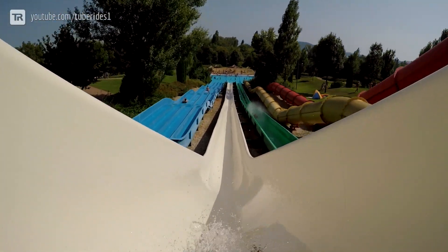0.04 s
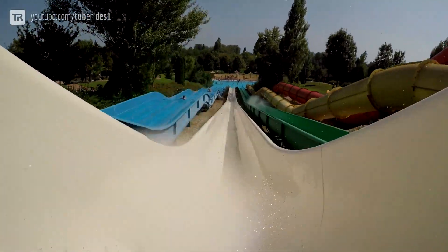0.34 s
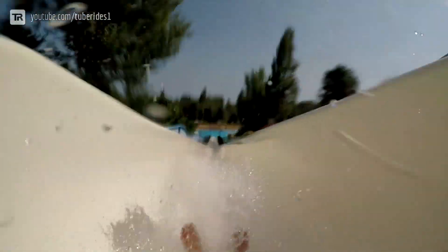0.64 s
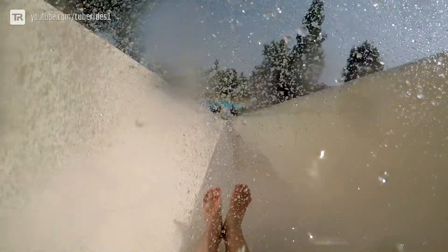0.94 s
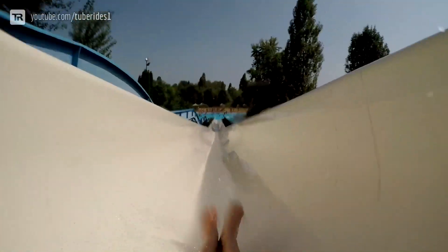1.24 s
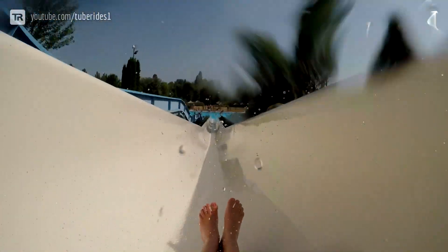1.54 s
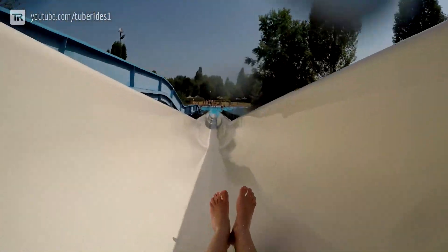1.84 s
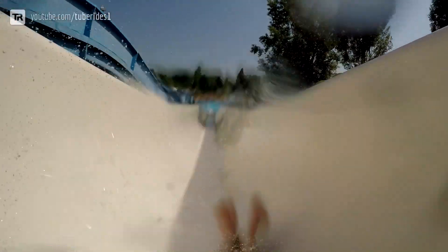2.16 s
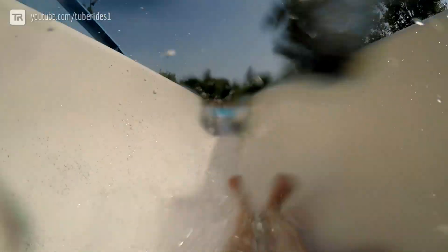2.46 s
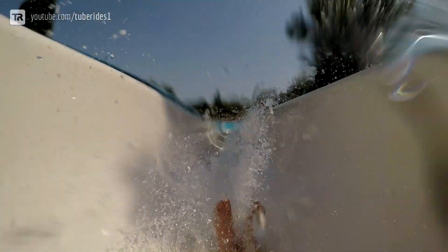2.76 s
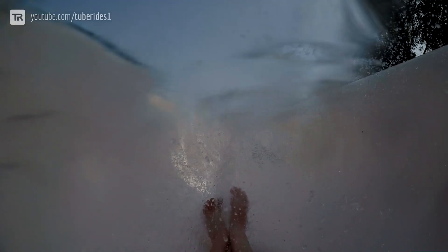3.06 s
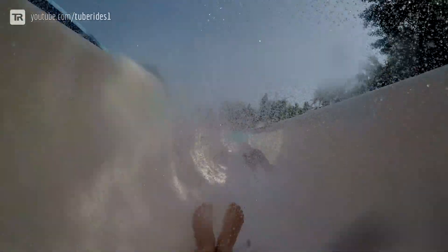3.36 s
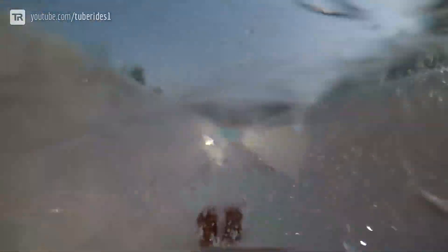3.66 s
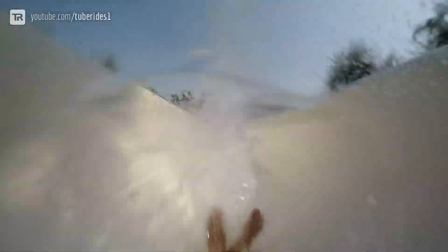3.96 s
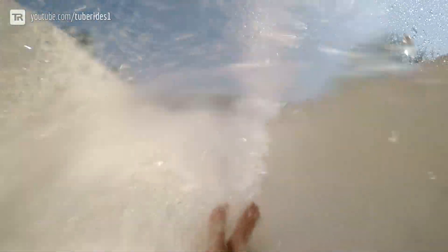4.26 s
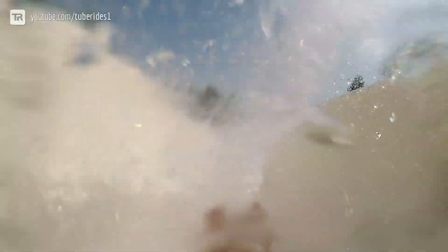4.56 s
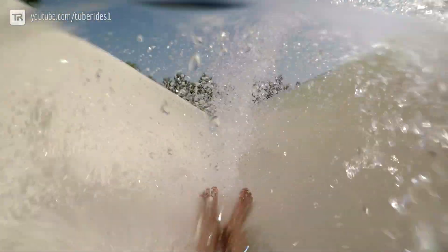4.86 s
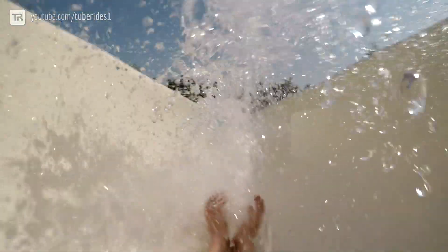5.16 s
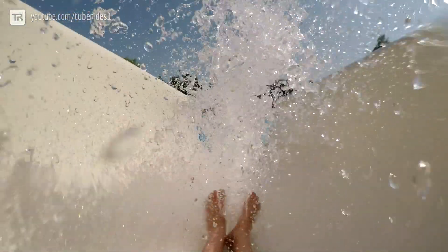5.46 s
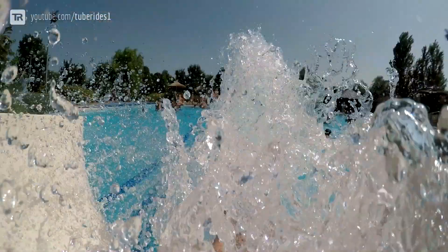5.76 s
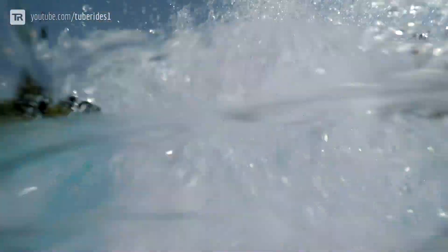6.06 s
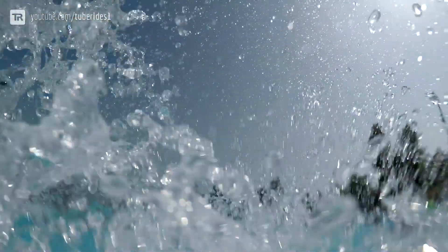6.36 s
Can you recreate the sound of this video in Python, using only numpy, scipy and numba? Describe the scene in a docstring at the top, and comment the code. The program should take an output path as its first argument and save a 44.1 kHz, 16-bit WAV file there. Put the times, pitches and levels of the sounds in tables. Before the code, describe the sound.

Gusts of air and water rumble against a small waterproof camera held by a rider going down an open water slide. Water churns and gurgles right over the microphone with a hollow ring, while spray hisses and single drops plink on the case. Slugs of water slap it repeatedly and the rider thuds softly on the slide twice. At the end, loud sheets of water crash over the microphone as the rider enters the pool.

```python
"""An open water slide and its pool, from the microphone ports of a small waterproof camera in the
rider's hand. Everything is close: gusts of air and water buffet the housing, and the wash churns under
a film of water that rings over the ports. Spray rattles on the case, slugs of water slap it, and twice
the rider thuds on the slide. As the rider ploughs into the pool, three sheets of water close over it."""
import sys
import numpy as np
from scipy import signal
from scipy.fft import rfft, irfft, next_fast_len
from scipy.io import wavfile
from scipy.ndimage import uniform_filter1d
from numba import njit

SR = 44100
rng = np.random.default_rng(int(sys.argv[2]) if len(sys.argv) > 2 else 0)


def dump_mix(stems):
    """Bounce the given channels to the path in sys.argv[1] as a 16-bit WAV at rate SR."""
    frames = np.atleast_2d(stems).T  # one column per channel
    limited = np.clip(frames, -1, 1)  # hard clip at full scale
    pcm = np.round(limited * 32767).astype(np.int16)
    wavfile.write(sys.argv[1], SR, pcm)


N = 286979
BLOW_TIME = np.arange(int(.04 * SR)) / SR   # time axis of one short blow [s]
TOP_HZ = 15550   # upper limit of the camera's sound
FILM_COUPLING = 0.27   # swing of the water film beside the direct sound
SLOSH_PER_S, PORT_DAMPING = 9.4, 0.08   # water moving in the ports; damping of their ring


def from_db(db):
    return 10 ** (np.asarray(db) / 20)


def together(*levels_db):
    """The level of unrelated sounds added up."""
    return 10 * np.log10(sum(from_db(db) ** 2 for db in levels_db))


def rms_one(x):
    return x / np.sqrt(np.mean(x ** 2))


def peak_one(x):
    return x / np.abs(x).max()


def silence():
    return np.zeros((2, N))


def in_time(rows):
    """Each column of a curve at every sample."""
    s, *columns = np.transpose(rows)
    return [np.interp(np.arange(N) / SR, s, c) for c in columns]


def panned(x, pan_db):
    """Left up and right down by half of the difference each."""
    return x * from_db(np.array([[.5], [-.5]]) * pan_db)


def add(out, s, sound):
    """Mix a short sound in at time s."""
    at = int(s * SR)
    out[:, at:at + sound.shape[1]] += sound[:, :N - at]


def blend(a, b, share):
    """Mix two unrelated sounds; the second has this share of the power."""
    share = np.clip(share, 0, 1)
    return np.sqrt(1 - share) * a + np.sqrt(share) * b


def evened(x, span_s):
    """Hold the mean power at 1 while faster lumps stay."""
    size = int(span_s * SR)
    power = uniform_filter1d(uniform_filter1d(np.mean(x ** 2, axis=0), size), size)
    return x / np.sqrt(np.maximum(power, 1e-12))


def filtered(x, hz, kind, order=2):
    """A gentle low-, high- or band-pass."""
    return signal.sosfilt(signal.butter(order, hz, kind, fs=SR, output="sos"), x)


def shaped(x, gain_at):
    """Give each frequency the gain that a rule sets for it."""
    size = next_fast_len(N)
    return irfft(rfft(x, size) * gain_at(np.fft.rfftfreq(size) * SR), size)[..., :N]


def coloured(x, spectrum):
    """Shape a noise by a spectrum."""
    hz, db = np.transpose(spectrum)
    return shaped(x, lambda f: from_db(np.interp(np.log1p(f), np.log1p(hz), db)))


def drift(per_s):
    """Smooth chance of spread 1 that changes about per_s times a second."""
    return rms_one(shaped(rng.standard_normal(N), lambda f: 1 / (1 + (f / per_s) ** 2)))


def wandering(hz, octaves, per_s):
    """A pitch that strays by chance."""
    return hz * np.exp2(octaves * drift(per_s))


@njit
def mass_on_spring(x, step, damping):
    """A driven mass on a spring, with tuning and damping given at every sample."""
    out = np.zeros_like(x)
    for c in range(len(x)):
        place = speed = 0.
        for i in range(len(step)):
            speed += step[i] * (x[c, i] - place - damping[i] * speed)
            place += step[i] * speed
            out[c, i] = place
    return out


def moving_lowpass(x, hz, damping):
    """A resonant low-pass; pitch and damping may be steady or move."""
    steady = np.ones(x.shape[-1])
    return mass_on_spring(x, 2 * np.sin(np.pi * hz / SR) * steady, damping * steady)


def ping(hz, cycles, rise_s=0.00017):
    """A damped ring of height 1 whose decay takes 60 dB in the given cycles."""
    decay = from_db(-60 * BLOW_TIME * hz / cycles)
    onset = 1 - np.exp(-BLOW_TIME / rise_s)
    return peak_one(np.sin(2 * np.pi * hz * BLOW_TIME) * decay * onset)


def burst(decay_s=0.00088):
    """The brief hiss of water bursting on the case."""
    return rng.standard_normal(len(BLOW_TIME)) * np.exp(-BLOW_TIME / decay_s)


def eddies(apart):
    """White turbulence: each port hears a common part and a share, apart, of its own."""
    return blend(rng.standard_normal(N), rng.standard_normal((2, N)), apart)


def impacts(per_s, spread_db, scatter_db):
    """Random droplet clicks of very uneven size, each nearer to one port."""
    sizes = from_db(spread_db * np.minimum(rng.exponential(1, N), 4)) * rng.choice([-1, 1], N)
    clicks = sizes * (rng.random(N) < per_s / SR)
    return rms_one(panned(clicks, scatter_db * rng.standard_normal(N)))


# The rider's body on the slide, within reach of the microphone: (time [s], peak [dB])
BODY_BUMPS = [(3.49, -21), (4.059, -22.5)]

def bumps():
    """The slide answers each bump with a short, deep thud."""
    out, thud = silence(), ping(hz=129, cycles=5.0, rise_s=0.0074)
    for s, peak_db in BODY_BUMPS:
        add(out, s, from_db(peak_db) * thud[None])
    return out


# Drops on the case, heard in the centre: (time [s], ring [dB], ring pitch [Hz], snap [dB])
CASE_DROPS = [(1.2937, -18, 4070, -36), (1.397, -11, 4130, -32), (1.8333, -11, 3950, -21),
              (2.2315, -24, 3250, -31), (2.413, -31, 4500, -21), (2.5288, -19, 5300, -14),
              (2.607, -22, 3600, -19), (3.088, -11.5, 4410, -19.5), (3.166, -15.5, 3870, -17),
              (3.344, -15, 3850, -33), (5.2834, -11.5, 4160, -52), (5.319, -17, 4300, -47),
              (5.3625, -20, 4460, -28), (5.441, -14, 4300, -22), (5.7346, -10.5, 4370, -28),
              (5.7785, -10.5, 5100, -31), (6.071, -9.5, 4180, -31)]

def drops():
    """Single large drops snap on the case and plink."""
    out = silence()
    for s, ring_db, ring_hz, snap_db in CASE_DROPS:
        snap = peak_one(filtered(burst(), [6500, 11000], "band"))
        ring = ping(ring_hz, cycles=18)
        add(out, s, (from_db(ring_db) * ring + from_db(snap_db) * snap)[None])
    return out


# Fine mist right on the case: (frequency [Hz], gain [dB])
MIST_SPECTRUM = [(4000, 3), (6000, 5.5), (10700, -5), (12200, -7.5), (16000, -24)]
# Thin upper resonance of the wet ports, lower as they fill: (time [s], pitch [Hz])
PORT_SIZZLE = [(1.1, 10300), (1.5, 9000), (2.24, 9100), (2.3, 8300), (3.25, 7800), (3.8, 7900)]

def mist(level_db, lumps, chop, apart, droplets):
    """Droplets crackle on the case; in smooth flow they merge into a fizz that sizzles in the ports."""
    crackle_hz = wandering(7000, octaves=.2, per_s=40)
    crackle = rms_one(moving_lowpass(droplets, crackle_hz, damping=.45))
    fizz = (eddies(apart * 0.057) + 2.3 * chop ** 2 * crackle) * from_db(3.7 * lumps)
    sizzle_hz, = in_time(PORT_SIZZLE)
    fizz = fizz + 0.12 * moving_lowpass(fizz, sizzle_hz, PORT_DAMPING)
    return from_db(level_db) * evened(coloured(fizz, MIST_SPECTRUM), span_s=0.44)


# Spray at the microphone: (frequency [Hz], gain [dB])
SPRAY_SPECTRUM = [(1200, -11), (2100, 7.5), (3100, -0.5), (5100, -7.5), (7500, -44)]
# The wet port cavity, lower as it fills: (time [s], pitch [Hz], hollow ring beside the hiss [dB])
PORT_CAVITY = [(0.9, 3900, -25), (1.13, 4520, 0.5), (1.28, 4200, -4), (2.45, 3390, -14), (2.85, 4230, -31),
               (3.27, 3860, -21), (3.36, 3470, 3), (3.7, 3450, 0), (4.28, 3850, -3), (4.65, 4130, -18)]

def spray(level_db, lumps, chop, apart, droplets):
    """A hiss of spray, plinks of scattered pitch, and the hollow ring both stir in the port cavity."""
    cavity_hz, hollow_db = in_time(PORT_CAVITY)
    rush = eddies(apart * 0.5) * from_db(4.0 * lumps)
    edge_hz = 1.21 * cavity_hz   # the hiss falls away above this
    hiss = rms_one(moving_lowpass(coloured(rush, SPRAY_SPECTRUM), edge_hz, damping=0.41))
    # drops land softly on the wet ports, so their plinks carry no top
    soft_drops = rms_one(filtered(droplets, TOP_HZ / 3, "low"))
    plink_hz = wandering(cavity_hz, octaves=.17, per_s=40)
    plinks = rms_one(moving_lowpass(soft_drops, plink_hz, damping=.07))
    sloshing_hz = wandering(cavity_hz, octaves=0.069, per_s=SLOSH_PER_S)
    hollow = rms_one(moving_lowpass(rms_one(rush) + soft_drops, sloshing_hz, PORT_DAMPING))
    return from_db(level_db) * evened(hiss + chop * plinks + from_db(hollow_db) * hollow, span_s=0.43)


def wash(level_db, lumps, apart, film_hz):
    """Water churning around the camera, duller under a thicker film."""
    churn = filtered(eddies(apart) * from_db(5.5 * lumps), [800, 1300], "band", order=1)
    dulled = moving_lowpass(churn, film_hz, damping=0.91)
    return from_db(level_db) * evened(dulled, span_s=0.098) / (1 + FILM_COUPLING)


# Water lying directly over the ports, lower when thicker: (time [s], resonance [Hz], sharpness [Q])
WATER_FILM = [(1.3, 2150, 0.7), (1.5, 1790, 11.5), (1.95, 1760, 11), (2.3, 1730, 2.1), (2.75, 1500, 6),
              (2.9, 2310, 2.3), (3.45, 1870, 6.3), (4.0, 1710, 1.6), (4.08, 1200, 1), (4.28, 1430, 5.6),
              (4.38, 1910, 5.1), (6.14, 1850, 5), (6.2, 1160, 0.84), (6.46, 1560, 1.3)]

def film_tuning():
    """Pitch and sharpness of the film; the pitch strays as the film thickens and thins."""
    film_hz, sharpness = in_time(WATER_FILM)
    return wandering(film_hz, octaves=0.053, per_s=SLOSH_PER_S), sharpness


def through_film(x, film_hz, sharpness):
    """The springy film rings at its resonance and, swinging against the sound, cuts the band above."""
    return x + FILM_COUPLING * moving_lowpass(x, film_hz, damping=1 / sharpness)


# Level of the water at the microphone, ducking as the camera's gain drops after big hits:
# (time [s], wash [dB], spray [dB], mist [dB])
WATER_LEVELS = [(0.0, -22, -38.5, -55), (0.7, -29, -37, -50), (1.25, -30.5, -32, -44),
                (2.45, -32, -31.5, -40), (2.85, -33.5, -35.5, -45), (3.29, -29.5, -32.5, -41.5),
                (3.33, -38, -42.5, -57), (3.75, -33.5, -37, -49), (4.1, -34, -39.5, -53),
                (4.87, -36.5, -36, -45.5), (4.91, -40.5, -43, -57.5), (5.5, -34, -34.5, -47),
                (6.14, -32.5, -33, -44.5), (6.19, -36, -44, -52), (6.38, -31.5, -45, -60)]

def water_levels(air_db, chop):
    """Levels of wash, spray and mist: each gust throws more water, the more so in choppy flow."""
    swing_db = air_db - uniform_filter1d(air_db, SR // 5)
    return in_time(WATER_LEVELS) + 0.83 * chop * swing_db


def gurgle(apart):
    """Air dragged under rings as bubbles of mixed size, each nearer to one port."""
    out = silence()
    for when, pitch, loud, side in rng.random(size=(1800, 4)):
        bubble = from_db(5.4 * loud) * ping(385 * 2.26 ** pitch, cycles=16.8)
        pan_db = 30 * np.sqrt(apart[int(when * N)]) * (side - .5)
        add(out, when * N / SR, panned(bubble, pan_db))
    # bubbles swing about the still pressure and carry no deep bass
    return filtered(out, 200, "high")


# Gusts on the housing, some laden with water: (middle [s], length [s], rumble [dB], wash [dB])
HOUSING_GUSTS = [(0.193, 0.11, -21, -26), (0.398, 0.09, -18.5, -42), (0.652, 0.15, -39, -22),
                 (1.309, 0.073, -22.5, -33), (1.416, 0.1, -20.5, -47), (1.561, 0.09, -19, -44),
                 (1.925, 0.02, -13.5, -25), (2.031, 0.015, -14.5, -28), (2.15, 0.014, -17.5, -20),
                 (2.248, 0.0067, -16, -40), (2.441, 0.077, -19.5, -22), (2.614, 0.044, -20, -26),
                 (2.748, 0.063, -17.5, -25), (2.907, 0.045, -20.5, -46), (3.2, 0.066, -22, -37.5),
                 (3.584, 0.015, -21, -47), (4.199, 0.053, -22.5, -33.5), (4.589, 0.028, -21.5, -51),
                 (5.766, 0.042, -25, -50)]

def gusts(edge_db=4):
    """Levels of the gusts' rumble and wash: each is a bell, edge_db down at the ends of its length."""
    t, bells = np.arange(N) / SR, []
    for s, length_s, *peaks_db in HOUSING_GUSTS:
        away = np.minimum((2 * (t - s) / length_s) ** 2, 20)
        bells.append(np.array(peaks_db)[:, None] - edge_db * away)
    return together(*bells)


# Level of the flow's rumble at the ports, ducking briefly after the loud slap near 4.9 s:
# (time [s], level [dB])
RUMBLE_LEVEL = [(0.0, -19), (1.15, -19), (1.22, -49), (1.75, -19.5), (2.1, -27), (3.35, -30), (4.1, -29),
                (4.87, -31), (4.97, -42), (5.3, -31), (5.7, -34), (5.95, -26.5), (6.2, -28.5)]

def rumble_level(chop, gust_db):
    """Level of the rumble with its gusts; lesser gusts come by chance."""
    base_db, = in_time(RUMBLE_LEVEL)
    return together(base_db + 3.5 * chop * drift(per_s=52), gust_db)


# Rumble of the flow on the microphone: (frequency [Hz], gain [dB])
BUFFET_SPECTRUM = [(30, -33), (50, -24), (80, -13), (130, -3), (330, 0.5), (700, -8), (950, -17.5),
                   (3000, -99)]

def buffeting(level_db, lumps, apart, bubbly):
    """Eddies break on the housing in lumps, mixed with the gurgle of bubbles."""
    flow = rms_one(coloured(eddies(apart * 0.071) * from_db(4.7 * lumps), BUFFET_SPECTRUM))
    return from_db(level_db) * evened(blend(flow, rms_one(gurgle(apart)), bubbly), span_s=0.061)


# Sheets of water breaking right over the camera:
# (time [s], swell [s], fall [s], rumble [dB], wash [dB], spray [dB], mist [dB])
WATER_SHEETS = [(0.549, 0.042, 0.049, -24, -32, -28.5, -39.5),
                (1.135, 0.11, 0.18, -22.5, -46, -28.5, -40.5), (6.137, 0.1, 0.022, -18.5, -21.5, -23, -35),
                (6.147, 0.0016, 0.0085, -11.5, -28, -6, -15), (6.345, 0.053, 0.016, -18, -16.5, -26, -34),
                (6.461, 0.016, 0.21, 2.5, -8, -28.5, -44)]

def splashes(range_db=11.5):
    """Levels of the four layers: each sheet gains range_db over its swell and loses it over its fall."""
    t, sheets = np.arange(N) / SR, []
    for s, swell_s, fall_s, *peaks_db in WATER_SHEETS:
        away = np.minimum(np.maximum((s - t) / swell_s, (t - s) / fall_s), 10)
        sheets.append(np.array(peaks_db)[:, None] - range_db * away)
    return together(*sheets)


# Slugs of water, direct hits on the housing:
# (time [s], thump [dB], ring [dB], ring pitch [Hz], crack [dB], left over right [dB])
HOUSING_SLAPS = [(0.263, -4, -3.5, 720, -24, 1), (0.907, -15, -7, 780, -27, 7),
                 (1.1931, -6, -10.5, 1150, -6, 3.5), (1.642, -30, -11.5, 1760, -34, 11),
                 (2.154, -12, -7, 1440, -14.5, 1), (2.264, -1.5, -12, 1200, -11.5, -3),
                 (3.3027, 1, 2.5, 940, -7, 2.5), (3.548, -8.5, -20, 1080, -40, 2),
                 (3.8741, -9.5, -8, 1900, -2, 2.5), (3.911, -14, -8, 940, -17, -4),
                 (4.006, -24, -36, 1670, -8, 3.5), (4.0548, -8, -13.5, 800, -40, -5.5),
                 (4.345, -6.5, -12, 1500, -11.5, -2.5), (4.8938, 1, -13.5, 596, -14.5, 5),
                 (6.1653, -32, -4.5, 1160, -25, 11), (6.174, -30, -2, 1170, -23, 6.5),
                 (6.396, -28, -6, 764, -37, -6), (6.444, 1, 2, 750, -19, -3), (6.453, -22, 6, 1390, -25, 0)]

def slaps():
    """A slug shoves the housing, rings the air it traps and bursts with a smack in the port cavity."""
    out, thump = silence(), ping(hz=352, cycles=1.6, rise_s=0.0023)
    cavity_hz, _ = in_time(PORT_CAVITY)
    for s, thump_db, ring_db, ring_hz, crack_db, pan_db in HOUSING_SLAPS:
        smack = filtered(burst(), 7000, "low")[None]
        crack = peak_one(moving_lowpass(smack, cavity_hz[int(s * SR)], damping=.15))
        ring = ping(ring_hz, cycles=7)
        slap = from_db(thump_db) * thump + from_db(ring_db) * ring + from_db(crack_db) * crack
        add(out, s, panned(slap, pan_db))
    # the microphones pass no steady pressure
    return filtered(out, 190, "high")


# The flow around the camera: (time [s], choppiness [0-1], stereo separation [0-1],
# left over right [dB], share of bubbles in the rumble [0-1])
FLOW_STATE = [(0, 0.23, 0.65, 4, 0.55), (.9, 0.4, 0.6, -1, 0.22), (4.3, 0.52, 0.19, 0.5, 0.12),
              (5.0, 0.18, 0.13, 0, 0.01), (6.45, 0.38, 0.15, 0, 0.4)]

def scene():
    """The ride as the two ports hear it from the rider's hand."""
    film_hz, sharpness = film_tuning()
    chop, apart, pan_db, bubbly = in_time(FLOW_STATE)
    gust_db, gush_db = gusts()
    air_db = rumble_level(chop, gust_db)
    ride_db = np.vstack([air_db, water_levels(air_db, chop)])
    buffet_db, wash_db, spray_db, mist_db = together(ride_db, splashes())
    # the four layers share the same quick surges, and each adds a flutter of its own
    surges = drift(per_s=19) + drift(per_s=210)
    lumps = lambda: chop * (surges + drift(per_s=96))
    rumble = buffeting(buffet_db, lumps(), apart, bubbly)
    water = panned(wash(together(wash_db, gush_db), lumps(), apart, film_hz), pan_db)
    droplets = impacts(per_s=170, spread_db=5.5, scatter_db=3.0)
    water += spray(spray_db, lumps(), chop, apart, droplets)
    water += mist(mist_db, lumps(), chop, apart, droplets)
    water = through_film(water, film_hz, sharpness)
    return panned(rumble, pan_db) + water + slaps() + drops() + bumps()


def gain_control(x, threshold_db, release_db_per_s):
    """Loud peaks pull the camera's gain down within milliseconds; it creeps back."""
    over_db = np.maximum(20 * np.log10(np.abs(x).max(axis=0) + 1e-9) - threshold_db, 0)
    ramp = release_db_per_s * np.arange(N) / SR
    held_db = np.maximum.accumulate(over_db + ramp) - ramp
    return x * from_db(-filtered(held_db, 70, "low", order=1))


# Cavities between the ports and the microphones: (frequency [Hz], width [Hz], gain [dB])
PORT_RESONANCES = [(7000, 4100, -6.5), (9070, 400, -14), (10150, 1260, 8.5)]

def record(dry):
    """The camera: ports colour the treble, gain ducks, big peaks overload, deep bass and top are cut."""
    for hz, width_hz, db in PORT_RESONANCES:
        b, a = signal.iirpeak(hz, hz / width_hz, fs=SR)
        dry = dry + (from_db(db) - 1) * signal.lfilter(b, a, dry)
    ducked = gain_control(dry, threshold_db=-3.5, release_db_per_s=125)
    limited = ducked / (1 + ducked ** 8) ** (1 / 8)
    top_cut = signal.ellip(10, .1, 80, TOP_HZ, fs=SR, output="sos")
    return signal.sosfilt(top_cut, filtered(limited, 53, "high"))


dry = scene()
out = record(dry)
dump_mix(out)
```